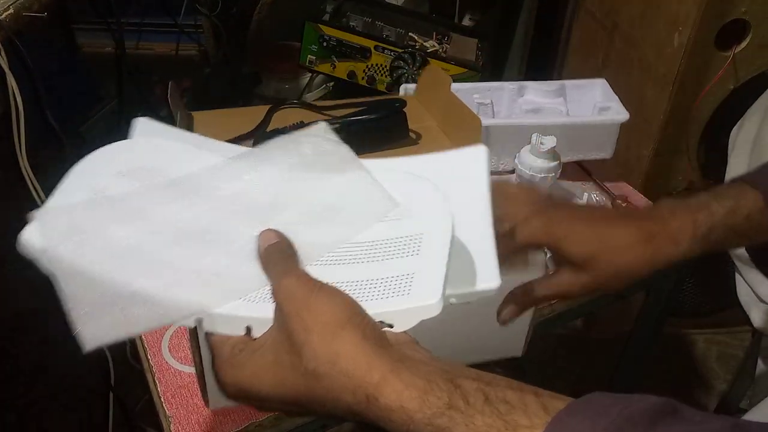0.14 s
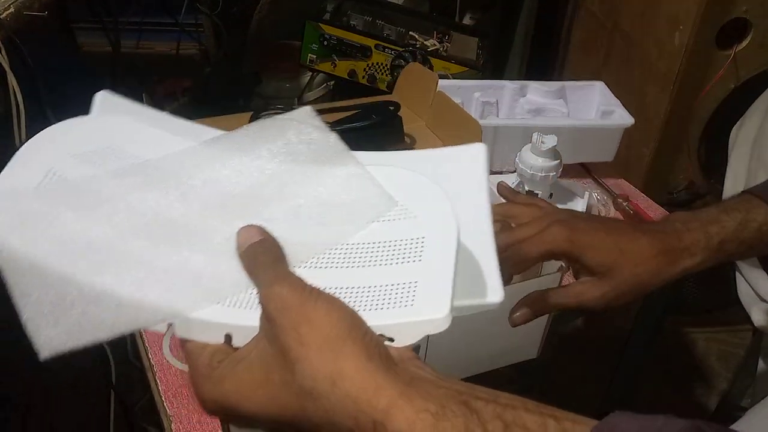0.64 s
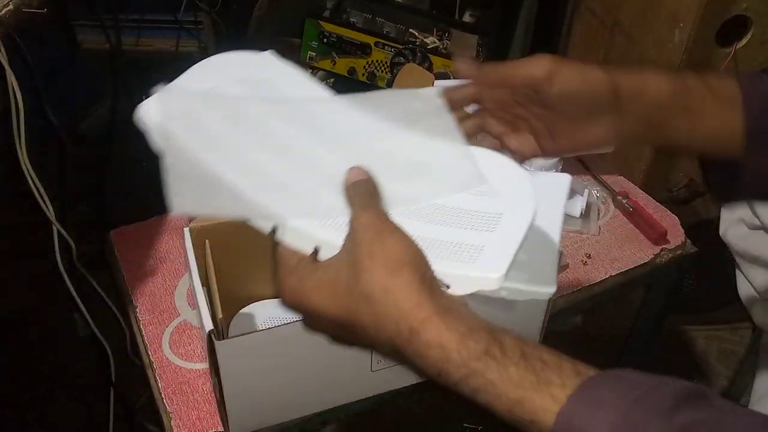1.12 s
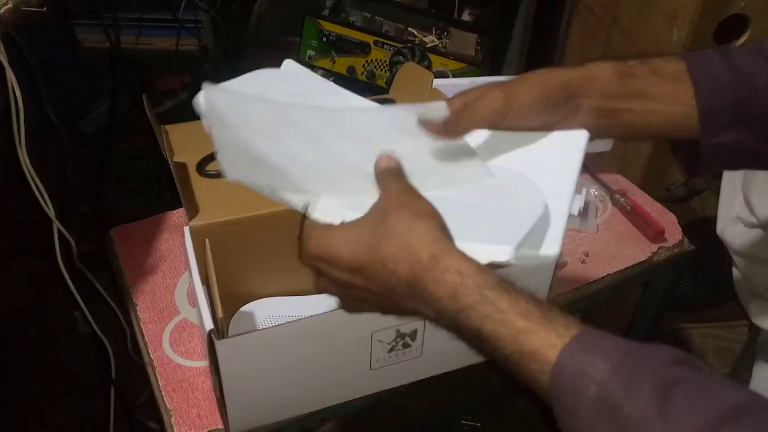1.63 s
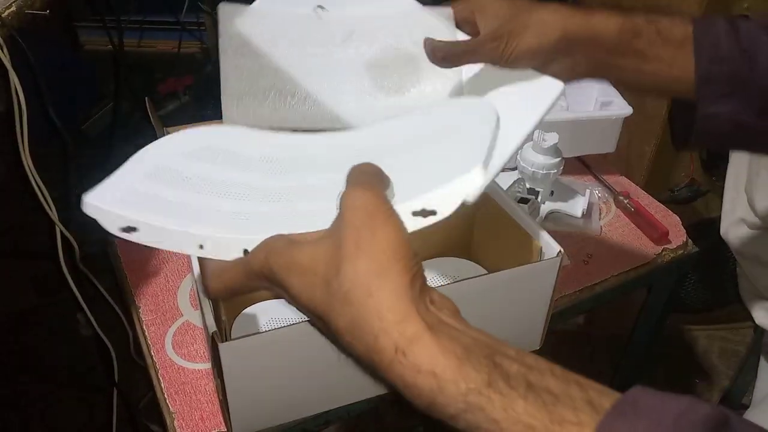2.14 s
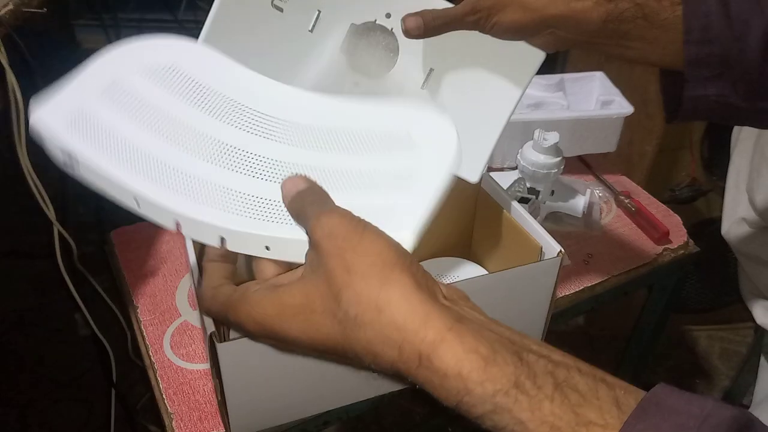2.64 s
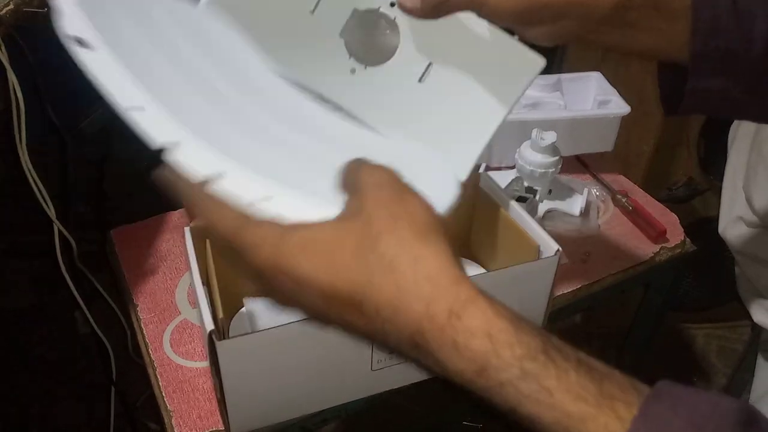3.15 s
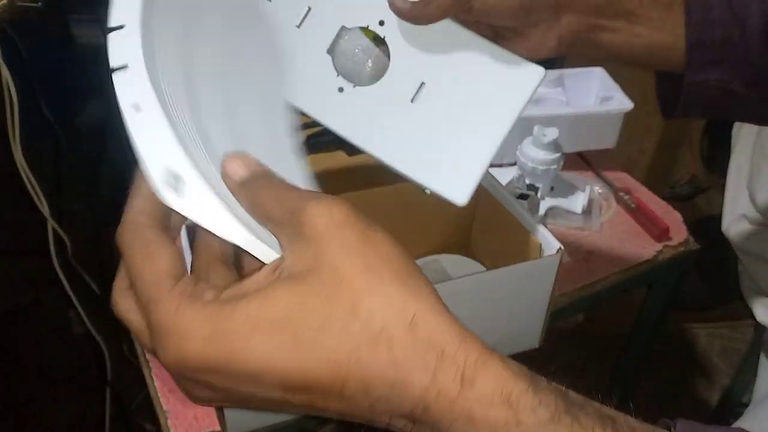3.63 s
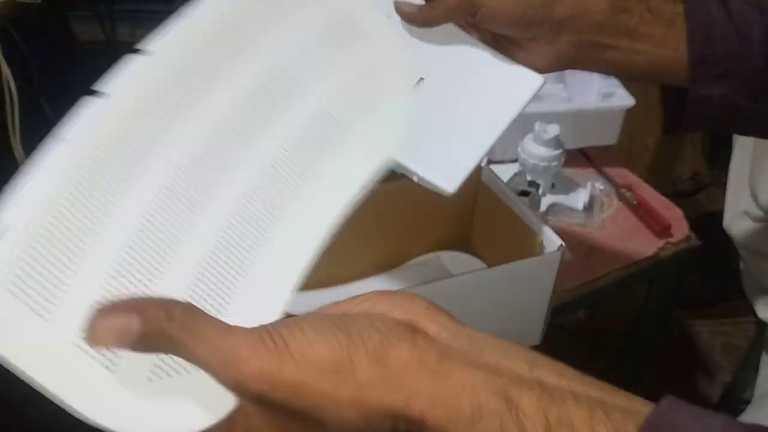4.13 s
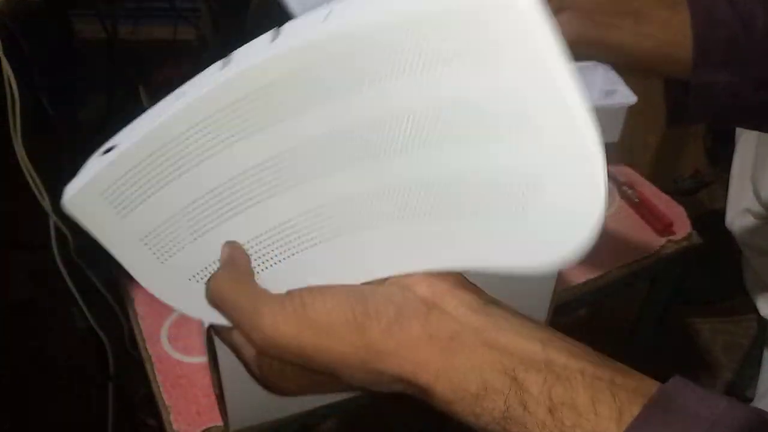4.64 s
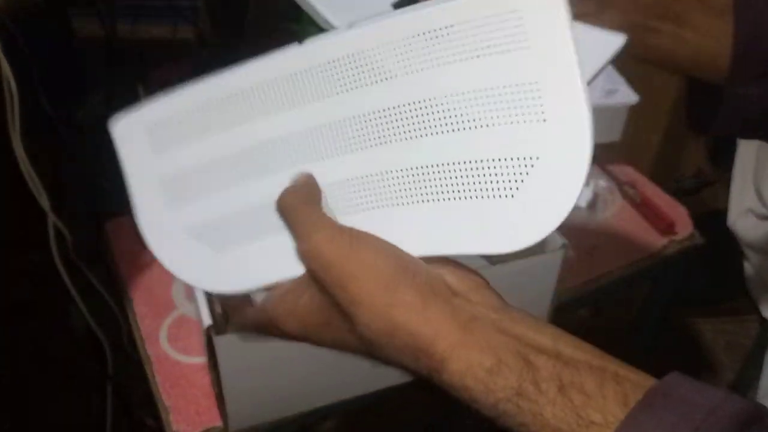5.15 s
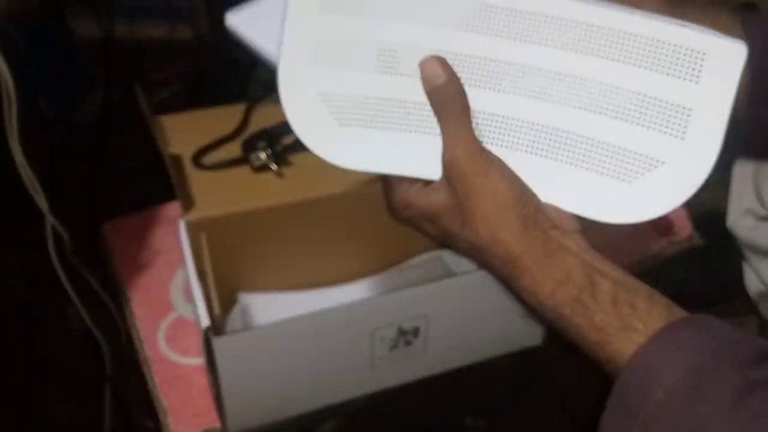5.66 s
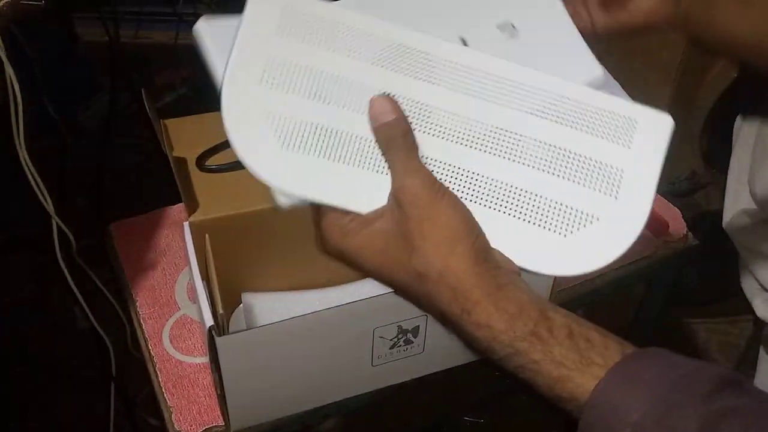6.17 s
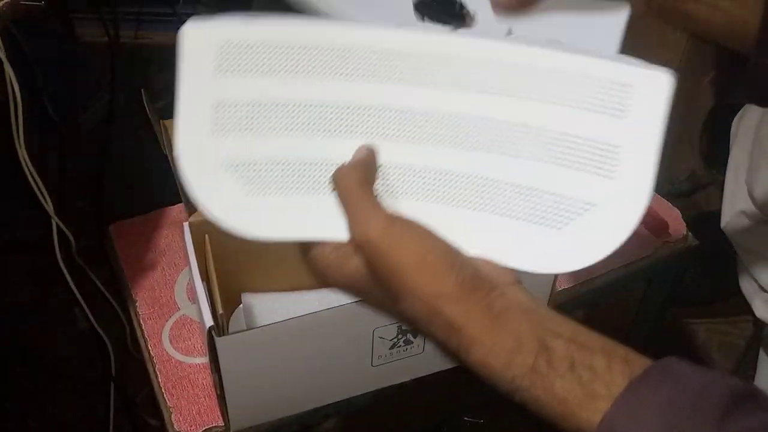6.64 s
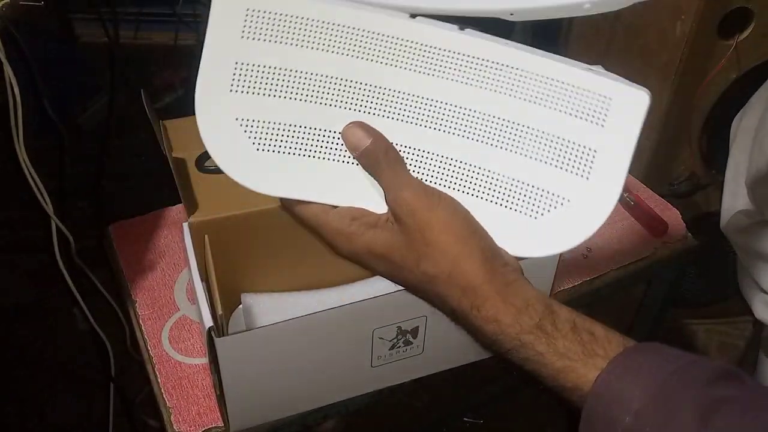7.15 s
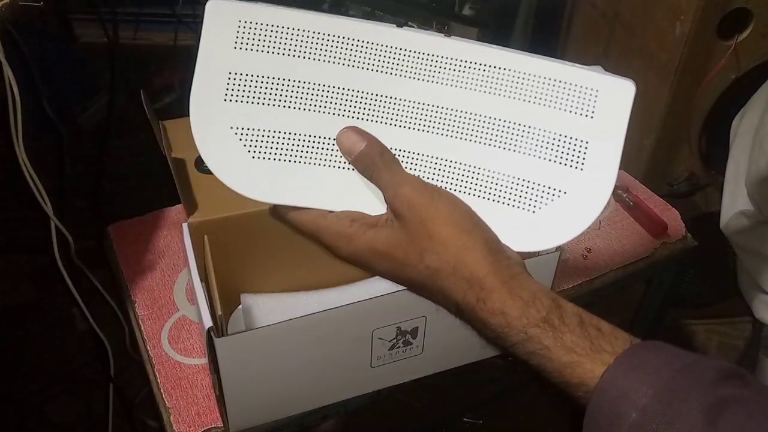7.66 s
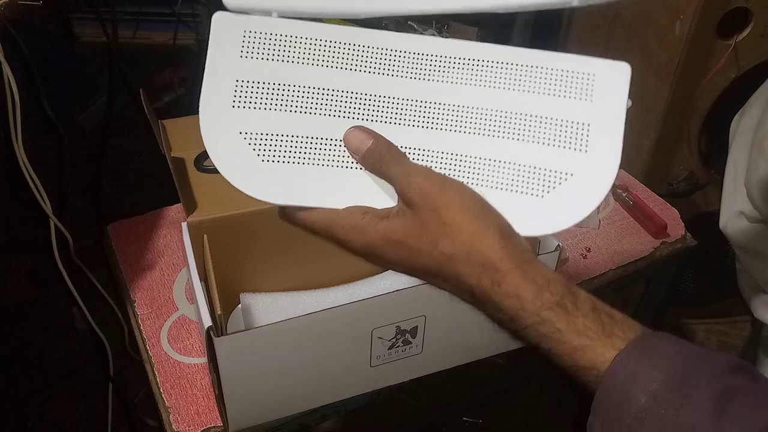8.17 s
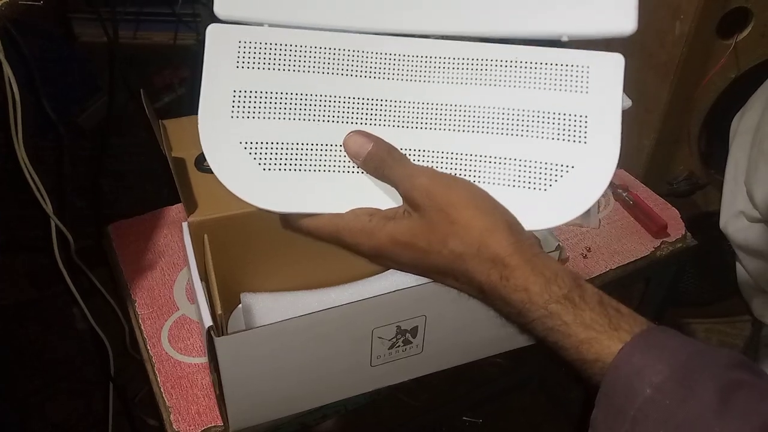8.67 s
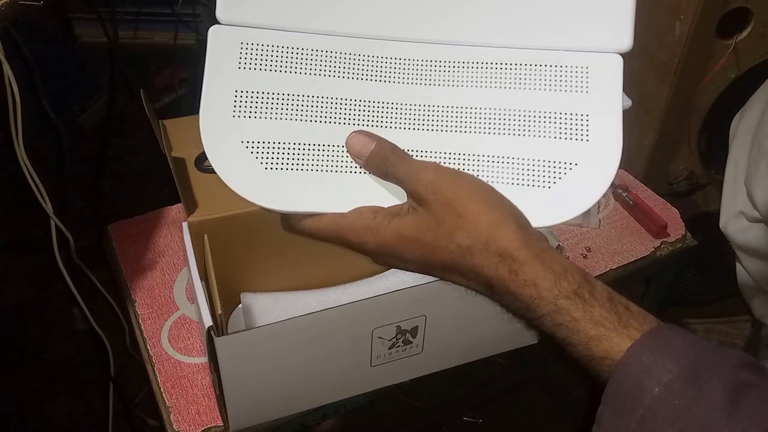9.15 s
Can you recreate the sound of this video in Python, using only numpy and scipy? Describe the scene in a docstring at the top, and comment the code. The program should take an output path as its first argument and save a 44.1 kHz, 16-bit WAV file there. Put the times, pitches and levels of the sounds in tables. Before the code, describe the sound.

Close phone pickup in a small room with low, soft rumble and barely audible hiss. From 0 to 0.6 s, dull knocks and gritty cardboard scraping come in quick succession as plastic panels leave a box, fading by 0.9 s; a crisp foam snap ticks at about 0.76 s. After a short lull, a loud, hard plastic clack hits at 1.4 s, followed until 2.1 s by weaker clacks, rattling and bright sliding with short resonant squeaks, as thin panels separate. Quiet rubbing follows, then another sharp clack near 3.15 s. From 3.3 to 6.3 s only faint finger slides, hollow palm rubs and tiny foam ticks remain, with a very faint falling whine around 6.1 s. Light plastic ticks cluster at 6.5-6.7 s; soft taps fall near 7.3, 7.9 and 8.3 s, a barely audible one at 9 s, then near quiet.

```python
"""Stiff panels and foam lifted from a cardboard box

Thin panels and foam sheets are turned over by hand, close to a phone, with a low rumble in the room.
The box is knocked and scraped, and late the panels bump softly: struck decaying modes and coloured grains.
Panels clack together and ring briefly as sums of damped modes; noise stirs the same modes as fingers slide,
and a loose grip lets some sing. Strokes and a palm are trains of tiny slips through resonances; foam snaps
are damped ticks with noise. A rustle, a faint falling whine, faint hiss and short echoes complete the scene."""
import sys
import numpy as np
from scipy import signal
from scipy.fft import rfft, irfft, next_fast_len
from scipy.io import wavfile
from scipy.ndimage import uniform_filter1d

SR = 44100
rng = np.random.default_rng(int(sys.argv[2]) if len(sys.argv) > 2 else 0)


def wav_out(sig):
    """Save sig, one row per channel (or a flat mono array), as 16-bit PCM at SR to the path in sys.argv[1]."""
    wavfile.write(sys.argv[1], SR, np.round(np.clip(np.atleast_2d(sig).T, -1, 1) * 32767).astype(np.int16))


def gain_from_decibels(decibels):
    """Convert decibel values to linear amplitude factors."""
    exponent = np.asarray(decibels, float) / 20
    return 10 ** exponent


N = 409688

# panel contacts: t/s, strength/dB, low-mode weight/dB, treble weight/dB, ringing left by the grip/s
CONTACTS = [(1.4131, -5.5, -17.5, -19, 0.16), (1.519, -25.5, -7, -40, 0.17), (1.6748, -32, -8, -38, 0.29),
            (1.7353, -23.5, -2.5, -30, .21), (1.8087, -14, -16, -27.5, 0.19), (1.8493, -14, -26, -26, 0.05),
            (1.8603, -14.5, -13, -23, 0.085), (1.9355, -20.5, -2.5, -17, 0.17),
            (2.01, -24.5, -35, -24, 0.18), (2.793, -53, -5, 7, 0.15), (3.156, -11, -12, -13.5, 0.14),
            (3.1574, -43, -24, -6, 0.17), (3.1893, -27, -14, -11, 0.17), (3.2894, -47, 10.5, -10, 0.39),
            (5.4332, -50, -1, -31, 0.16), (5.881, -52, -20.5, -36, .22), (6.3704, -47, -37, -29, .22),
            (6.5328, -41, -26, -38, 0.053), (6.6054, -44, -21, -39, 0.23), (6.6473, -35.5, -27, -23, 0.16),
            (6.8717, -55, -38, 2.5, 0.067), (7.295, -31.5, -21, -18, 0.084), (7.5745, -50, -12, -22, .09),
            (7.876, -22.5, -22, -57, 0.094), (8.3326, -22.5, -5.5, -25, 0.075), (8.985, -62, -4, -18, .16)]
# dull knocks on the box and, late, soft bumps of the panels:
# t/s, strength/dB, deep-mode weight/dB, click weight/dB
DULL_KNOCKS = [(0.004, -48.5, 23, -18), (0.123, -17, -23, 6.5), (0.145, -28.5, 5, 16),
               (0.198, -27.5, 1, 10), (0.28, -42.5, 12.5, -8), (0.333, -30, -23, -0.5),
               (0.372, -28, -25, -6.5), (0.415, -31.5, -8, -11), (0.432, -27.5, -9, 2.5),
               (0.519, -33.5, -21, -2.5), (0.556, -42.5, -17, -1.5), (0.823, -37.5, -16, -9),
               (0.853, -41.5, -23, -26), (2.949, -45.5, -16, -4), (3.28, -52, 2, 5), (3.514, -56, 4.5, -9),
               (5.053, -51.5, 8, 0), (8.329, -47.5, -16, 3.5), (8.984, -50.5, -7.5, -8.5)]
# foam snaps: t/s, strength/dB, tick f/Hz
FOAM_SNAPS = [(0.7595, -34, 6400), (1.0295, -62, 2770), (1.1084, -60.5, 4700), (2.361, -53, 6330),
              (4.4643, -47.5, 4170), (5.6373, -40.5, 4700), (5.7689, -49, 4150), (5.792, -50.5, 4220),
              (7.4794, -72, 2850)]
# panel modes: f/Hz, relative level/dB, own decay time t60/s
PANEL_MODES = [(730, -14, .13), (931, -10, .15), (1174, -8, .4), (1241, -8, .4), (1425, -10, .15),
               (1490, -10, .2), (1620, -13, .15), (1800, -12, .2), (1935, -9, .19), (2020, -7, .25),
               (2180, -7, .3), (2229, -4, .3), (2500, -9, .25), (2770, -4, .15), (2880, -2, .13),
               (3004, -2, .22), (3040, -4, .15), (3160, -5, .13), (3235, -5, .1), (3400, -9, .15),
               (3591, -5, .19), (3780, -8, .15), (3940, -3, .13), (4240, -5, .14), (4365, -5, .14),
               (4595, -8, .17), (4790, -4, .16), (5093, -10, .18), (5300, -9, .2), (5453, -10, .2),
               (5720, -12, .25), (6530, -15, .16)]
# spectrum of foam noise: f/Hz, relative level/dB
FOAM_SPECTRUM = [(4120, -38), (7000, -4), (8340, -21.5), (11500, -1.5), (13600, -8.5), (14500, -2),
                 (15100, 2), (15700, -8), (16200, -9)]
# spectrum of rubbed cardboard: f/Hz, relative level/dB
CARDBOARD_SPECTRUM = [(35, -46), (60, -19), (87, -11), (173, -12.5), (225, 3), (392, -2), (601, -0.5),
                      (879, -18), (960, -8.5), (2000, -23), (2600, -34.5), (4400, -120)]
STROKE_RISE_DB_PER_S, STROKE_FALL_DB_PER_S = 448, 261


def rms_one(x):
    """Normalization: scales to unit mean power."""
    return x / np.sqrt(np.mean(x ** 2) + 1e-20)


def in_time(rows):
    """Linear interpolation: gives each table column one value per sample."""
    s, *columns = np.transpose(rows)
    return [np.interp(np.arange(N) / SR, s, column) for column in columns]


def power_sum(*tracks_db):
    """Incoherent addition: levels add as powers."""
    return 10 * np.log10(sum(gain_from_decibels(2 * db) for db in tracks_db))


def coloured(x, spectrum, low_hz=20, high_hz=20000):
    """Linear filtering: weights a signal's spectrum between two soft edges; rms 1."""
    hz = np.arange(1, N // 2 + 2) * SR / N
    at, db = np.transpose(spectrum)
    edges = 1 / np.sqrt((1 + (low_hz / hz) ** 8) * (1 + (hz / high_hz) ** 8))
    gain = gain_from_decibels(np.interp(np.log(hz), np.log(at), db))
    return rms_one(irfft(rfft(x) * gain * edges, N))


def drift(rate_hz):
    """Low-pass random process: slow chance of unit spread, from two equal poles at the given rate."""
    step = 40   # samples between slow values
    r = np.exp(-2 * np.pi * step * rate_hz / SR)
    noise = rng.standard_normal(N // step + 2002)
    slow = signal.lfilter([1], [1, -2 * r, r * r], noise)[2000:]   # without the filter's start
    return np.interp(np.arange(N) / step, np.arange(len(slow)), rms_one(slow))


def grains(per_s, spread_db):
    """Stick-slip friction: tiny slips at random moments, a few much stronger than the rest; rms 1."""
    sizes = gain_from_decibels(spread_db * np.minimum(rng.exponential(1, N), 5)) * rng.choice([-1, 1], N)
    return rms_one(sizes * (rng.random(N) < per_s / SR))


def ring(force, hz, t60):
    """Damped oscillator: a unit click sets a decaying sine of height 1 ringing."""
    r, w = gain_from_decibels(-60 / (t60 * SR)), 2 * np.pi * hz / SR
    return signal.lfilter([0, np.sin(w)], [1, -2 * r * np.cos(w), r * r], force + 1e-18)


def resonance(x, hz, width_hz):
    """Resonant transmission: a band-pass with gain 1 on top."""
    r = np.exp(-np.pi * width_hz / SR)
    feedback = [1, -2 * r * np.cos(2 * np.pi * hz / SR), r * r]
    return signal.lfilter([(1 - r * r) / 2, 0, (r * r - 1) / 2], feedback, x)


def patchy(x, low_hz, high_hz, patchy_db, count):
    """Modal modulation of a flexing sheet: close resonances swell and fade each on its own; rms 1."""
    step = (high_hz / low_hz) ** (1 / count) - 1
    out = np.zeros(N)
    for k, hz in enumerate(np.geomspace(low_hz, high_hz, count)):
        out += (-1) ** k * gain_from_decibels(patchy_db * drift(6.0)) * resonance(x, hz, 0.85 * step * hz)
    return rms_one(out)


def fade(s, t60, rise_s):
    """Exponential decay: start index and envelope of a burst that rises fast and dies away."""
    start = round(s * SR)
    t = np.arange(min(N - start, int(1.5 * t60 * SR) + 2)) / SR
    return start, (1 - np.exp(-t / rise_s)) * gain_from_decibels(-60 * t / t60)


def swells(start, hold, levels_db, rise_db_per_s, fall_db_per_s):
    """Exponential growth and decay: events rise, hold and fall, adding as powers; one dB track a level."""
    t = np.arange(0, N / SR + .002, .001)[:, None]
    rise_db = rise_db_per_s * np.maximum(start - t, 0)
    fall_db = fall_db_per_s * np.maximum(t - start - hold, 0)
    power = gain_from_decibels(-2 * (rise_db + fall_db)) @ gain_from_decibels(2 * np.transpose(levels_db))
    total_db = 10 * np.log10(power + 1e-11)
    return [np.interp(np.arange(N) / SR, t[:, 0], track) for track in total_db.T]


def set_off(start, hold, levels_db, rise_db_per_s, fall_db_per_s):
    """Impulsive excitation: swells begin suddenly where a contact, snap or knock falls near the start."""
    near_s, sudden_db_per_s = .012, 6000
    blows = np.array([row[0] for row in CONTACTS + FOAM_SNAPS + DULL_KNOCKS])
    nearest = blows[np.abs(start[:, None] - blows).argmin(axis=1)]
    struck = np.abs(start - nearest) < near_s
    return swells(np.where(struck, nearest + .002, start), hold, levels_db,
                  np.where(struck, sudden_db_per_s, rise_db_per_s), fall_db_per_s)


def scrape():
    """Stick-slip friction: grains coloured by cardboard die out as the stack comes free; knocks jolt them."""
    # scraping in the box: t/s, level/dB
    scrape_level = [(0.0, -23.5), (.07, -37), (.3, -45.5), (.6, -53.5), (.66, -53), (.86, -57.5),
                    (1.0, -62.5), (1.3, -91)]
    jolt_db, jolt_s, jolt_fall_db_per_s = -9, 0.016, 352.5
    s, knock_db = np.transpose(DULL_KNOCKS)[:2]
    jolts_db, = swells(s, jolt_s, [knock_db + jolt_db], 3000, jolt_fall_db_per_s)
    level_db = power_sum(*in_time(scrape_level), jolts_db)
    return gain_from_decibels(level_db - 4.5) * coloured(grains(2500, 5.8), CARDBOARD_SPECTRUM)


def knocks():
    """Modal excitation: dull knocks on the box and, late, soft panel bumps ring modes, each with a click."""
    # modes of the knocks and bumps: f/Hz, relative level/dB, decay time t60/s
    knock_modes = [(101, -15.5, 0.21), (224.1, -3, .3), (370, -1, 0.034), (488, -21, 0.87),
                   (588.3, 6.5, 0.018), (682.5, 6, 0.021), (820, -5.5, 0.03), (949, -8.5, .07)]
    s, strength_db, deep_db, click_db = np.transpose(DULL_KNOCKS)
    at = np.round(s * SR).astype(int)
    chance_db = 0.75 * rng.standard_normal((len(s), len(knock_modes)))
    out = np.zeros(N)
    for k, (hz, level_db, t60) in enumerate(knock_modes):
        struck_db = strength_db - 6.5 + level_db + deep_db * (hz < 400) + chance_db[:, k]
        force = np.zeros(N)
        force[at] = (-1) ** k * gain_from_decibels(struck_db)
        out += ring(force, hz, t60)
    force = np.zeros(N)
    force[at] = gain_from_decibels(strength_db + click_db)
    click = ring(force, 1900, 0.003) - gain_from_decibels(-3.0) * ring(force, 3500, 0.0022)
    return out + signal.sosfilt(signal.butter(2, 5000, fs=SR, output="sos"), click)


def stroke_levels():
    """Superposition of strokes: level tracks of the bright, dull and hissing parts."""
    # hands and foam over the panels: start t/s, hold/s, level/dB, dull part level/dB, foam hiss level/dB
    # (the last two against the stroke)
    strokes = [(0.0, 0.045, -43, 2, -13), (0.079, 0.12, -48, 3.5, -12), (.123, 0.017, -41.5, 3.5, -17),
               (0.182, 0.116, -45.5, 1, -12.5), (.3, .04, -56, 5, -10), (.372, .05, -55.5, 4, -11),
               (0.421, 0.0068, -53, 8.5, -20), (0.473, .05, -61, 7, -13), (0.582, 0.081, -85, 13, -25),
               (0.698, 0.1, -69.5, 1, -16), (0.829, 0.039, -89.5, 22, -20), (1.017, 0.15, -81.5, 9, -25),
               (1.238, .08, -57, 0.5, -7), (1.355, 0.024, -49, 6, -13.5), (1.44, .02, -34.5, -6, -37.5),
               (1.585, 0.026, -58.5, -5, -5), (1.69, .02, -50.5, -4, -13.5), (1.725, .02, -38, -6, -20),
               (1.837, 0.038, -29.5, -16, -23), (1.932, 0.027, -32, -30, -19.5),
               (2.01, 0.045, -53, -6, -4.5), (2.15, 0.11, -81, -0.5, -1), (2.284, 0.2, -67.5, -10, -5.5),
               (2.523, .16, -67, -9.5, -2), (2.74, 0.036, -76, 0, -2), (2.81, .025, -66, -4, 2),
               (2.936, .2, -64.5, -6, -2.5), (3.183, .02, -43.5, 0.5, -9), (3.219, 0.11, -59, 4, -9),
               (3.368, 0.111, -70, 4.5, -9), (3.529, 0.018, -62.5, 4, 0.5), (3.652, 0.39, -81, 6, -8.5),
               (3.784, 0.046, -67.5, -8.5, -4.5), (3.867, .1, -75.5, 3.5, -9),
               (3.987, .07, -70.5, -3.5, -5.5), (4.08, .1, -80.5, 3.5, -10), (4.226, .02, -62, -15, -12.5),
               (4.264, 0.021, -51.5, -5, -12.5), (4.454, 0.0037, -64.5, -10.5, -7),
               (4.521, 0.022, -72, -6, -4.5), (4.654, 0.076, -66.5, -13.5, -8),
               (4.799, .22, -72, -10.5, -8), (5.02, .02, -66.5, -7, -11), (5.064, 0.023, -58, -17.5, -14),
               (5.209, 0.05, -58, -12, -9.5), (5.3, 0.067, -66.5, -14, -7.5), (5.42, 0.023, -63.5, -7, -12),
               (5.538, 0.095, -72, -3.5, -13), (5.647, 0.035, -66.5, -5, -9),
               (5.758, 0.043, -70.5, 0.5, -24), (5.88, 0.022, -63, -3, -14), (5.995, 0.087, -61, -9, -11.5),
               (6.108, 0.099, -60.5, -10.5, -15.5), (6.272, 0.055, -75, -3, -20),
               (6.35, 0.073, -63.5, -32, -13), (6.476, 0.055, -69, -14, -9), (6.525, 0.0045, -63, -10, -37),
               (6.622, 0.058, -62, -10, -8), (6.862, 0.011, -64.5, -31.5, -6),
               (6.92, 0.0727, -74, -11, -10), (7.294, 0.037, -64.5, 9, -19.5), (7.44, 0.025, -79, 7, -29.5),
               (7.573, .005, -74, -2, -14), (7.876, 0.072, -70.5, 6.5, -30), (8.334, .06, -67.5, 2.5, -25),
               (8.469, 0.0076, -95, 13, -5), (8.977, 0.0018, -84.5, 20, 5)]
    s, hold, stroke_db, dull_db, foam_db = np.transpose(strokes)
    return set_off(s, hold, [stroke_db, stroke_db + dull_db, stroke_db + foam_db],
                   STROKE_RISE_DB_PER_S, STROKE_FALL_DB_PER_S)


def slide(bright_db, dull_db, hiss_db):
    """Friction through a resonant sheet: dense fine slips flutter together as the pressure wavers."""
    # sliding spectrum: f/Hz, relative level/dB
    slide_colour = [(350, -24), (600, -2), (806, -20.5), (1210, -6.5), (1630, -9), (2210, -9), (2620, -12),
                    (3000, -4), (3400, -0.5), (4030, 0.5), (6410, -8.5), (7860, -33.5), (9000, -30.5),
                    (11700, -66.5), (19800, -120)]
    dull_below_hz = 3050
    flutter = gain_from_decibels(2.0 * drift(20))
    bright = coloured(grains(9000, 4.0), slide_colour, low_hz=dull_below_hz)
    dull = coloured(grains(6000, 1.5), slide_colour, high_hz=dull_below_hz)
    bright = patchy(bright, low_hz=2300, high_hz=8500, patchy_db=4.0, count=40)
    dull = patchy(dull, low_hz=780, high_hz=2600, patchy_db=3.5, count=18)
    hiss = coloured(grains(9000, 3.5), FOAM_SPECTRUM)
    return flutter * (gain_from_decibels(bright_db - 2.5) * bright + gain_from_decibels(dull_db - 2.5) * dull + gain_from_decibels(hiss_db) * hiss)


def friction(stroke_db, songs_db):
    """Random modal excitation: fingers stir all panel modes; the shifting grip frees now one, now another."""
    parted_s, stacked_db = 1.1, -12   # until the stack is parted the panels damp each other
    stroke_ring_db, song_ring_db = -3, 1.5   # how much strokes and singing pairs stir the modes
    stacked = np.arange(N) < parted_s * SR
    from_strokes_db = stroke_db + stroke_ring_db + stacked_db * stacked
    ringing_db = power_sum(from_strokes_db, np.mean(songs_db, axis=0) + song_ring_db)
    out = np.zeros(N)
    for hz, level_db, t60 in PANEL_MODES:
        force_db = ringing_db - 42.5 + level_db + 4.0 * drift(6.7)
        out += ring(gain_from_decibels(force_db) * rng.standard_normal(N), hz, t60)
    return out


def rumble():
    """Filtered random noise: low bands fill the room at a slowly changing level."""
    # rumble spectrum: f/Hz, relative level/dB
    rumble_spectrum = [(18, -41.5), (30, -10), (40, -14), (48, 0), (59, 0), (75, -8), (102, 1.5),
                       (125, -3.5), (155, -2), (172, -12), (192, -2.5), (205, 0), (221, -1.5), (242, -9),
                       (312, -8), (420, -21), (550, -46.5), (920, -120)]
    # room rumble: t/s, level/dB
    rumble_level = [(0.0, -40.5), (0.1, -45), (0.2, -50), (0.44, -54), (0.8, -55.5), (1.22, -55.5),
                    (1.37, -55), (3.21, -55.5), (4.14, -58), (4.92, -59), (6.03, -58.5), (6.54, -57),
                    (7.37, -58.5), (7.94, -57.5), (9.29, -60)]
    level_db, = in_time(rumble_level)
    return gain_from_decibels(level_db) * coloured(rng.standard_normal(N), rumble_spectrum, high_hz=407)


def air():
    """Filtered random noise: a faint steady room hiss."""
    # hiss spectrum: f/Hz, relative level/dB
    air_spectrum = [(460, -46.5), (780, -19.5), (874, -4), (1030, -17.5), (1130, -6), (1200, -9.5),
                    (1250, -15), (1470, -17.5), (1690, -15.5), (2100, -18.5), (13700, -38), (15000, -22),
                    (16200, -27.5)]
    return gain_from_decibels(-82) * coloured(rng.standard_normal(N), air_spectrum, low_hz=800)


def snaps():
    """Impulsive release: foam cells burst, one heavily damped tick each, with a wide spit of noise."""
    out, spit = np.zeros(N), coloured(rng.standard_normal(N), FOAM_SPECTRUM)
    for s, strength_db, hz in FOAM_SNAPS:
        start, shape = fade(s, 0.0074, .0001)
        end = start + len(shape)
        tick = np.sin(2 * np.pi * hz * np.arange(len(shape)) / SR)
        out[start:end] += gain_from_decibels(strength_db - 1.5) * shape * (tick + gain_from_decibels(-5.5) * spit[start:end])
    return out


def rustle():
    """Noise through fluctuating resonances: a low rustle of sleeves and cardboard."""
    # rustle: t/s, level/dB
    rustle_level = [(.9, -89), (1.0, -75.5), (1.35, -60.5), (1.7, -66), (1.92, -59), (2.27, -72),
                    (3.3, -69.5), (3.6, -73), (5.85, -76.5), (6.24, -70), (6.73, -78), (7.42, -72.5),
                    (7.7, -77.5), (8.34, -75), (8.66, -82.5), (9.29, -83)]
    level_db, = in_time(rustle_level)
    rub = coloured(rng.standard_normal(N), CARDBOARD_SPECTRUM, low_hz=405, high_hz=680)
    return gain_from_decibels(level_db) * patchy(rub, low_hz=329.7, high_hz=760, patchy_db=4.0, count=9)


def song_levels():
    """Superposition of swells: one level track for each of three mode pairs."""
    # moments when a loose grip lets the pairs sing: start t/s, hold/s,
    # level/dB near 1.2 kHz, level/dB near 2.2 kHz, level/dB near 3 kHz
    songs = [(1.22, .04, -75, -58, -62.5), (1.328, 0.035, -44.5, -45.5, -57.5),
             (1.436, 0.034, -47, -46, -34), (1.505, 0.028, -57, -40.5, -58.5),
             (1.723, 0.013, -36, -38.5, -36.5), (1.837, 0.027, -36, -32, -31.5),
             (1.961, 0.023, -31.5, -42, -53.5), (2.034, 0.0079, -60, -50, -41.5),
             (2.102, 0.064, -68.5, -67.5, -82), (2.25, 0.47, -76.5, -90, -82.5),
             (2.789, .01, -62, -77, -85), (3.01, .03, -70, -92, -80.5), (3.183, 0.037, -43, -49, -42.5),
             (3.29, .04, -53, -65, -59), (3.4, 0.22, -69.5, -74, -78), (3.699, 0.54, -76, -81.5, -87.5),
             (4.27, 0.014, -73, -67, -48.5), (4.76, 0.019, -81, -65.5, -66.5),
             (4.98, 0.089, -66.5, -74, -73), (5.184, 0.28, -75, -86, -71), (5.539, 0.082, -70, -71, -71.5),
             (5.89, 0.021, -83, -71, -58.5), (6.064, 0.14, -85, -60, -59.5), (6.34, 0.091, -99, -58, -59),
             (6.634, 0.028, -86, -52, -54), (6.886, 0.017, -93, -95, -68), (7.296, .05, -65.5, -64.5, -74),
             (7.584, .01, -71.5, -92, -75.5), (7.883, 0.009, -77, -56, -47.5),
             (7.9, 0.056, -74, -76, -74.5), (8.322, .025, -60, -56.5, -51), (8.37, 0.064, -89, -81, -78),
             (8.983, 0.0063, -83, -76, -79)]
    s, hold, *pairs_db = np.transpose(songs)
    return set_off(s, hold, pairs_db, rise_db_per_s=498, fall_db_per_s=231.5)


def singing(songs_db):
    """Narrow-band resonance: each mode pair is rubbed into a narrow, beating tone."""
    # singing pairs, one a row: lower f/Hz, upper f/Hz
    singing_pairs = [(1174, 1241), (2181, 2229), (2876, 3020)]
    out = np.zeros(N)
    for level_db, pair in zip(songs_db, singing_pairs):
        for hz in pair:
            tone = rms_one(resonance(rng.standard_normal(N), hz, width_hz=16.0))
            out += gain_from_decibels(level_db - 9.5) * tone
    return out


def clacks():
    """Modal impact: contacts strike each mode with its own strength, damped by the grip, and rattle edges."""
    # rattling spectrum: f/Hz, relative level/dB
    rattle_spectrum = [(240, -56), (400, -20.5), (453, -20.5), (553, -24), (935, -12.5), (1090, -33),
                       (1180, -8.5), (1380, -15.5), (1870, -12), (2360, -3), (2550, -7), (2750, -5),
                       (5870, -11), (7870, -26.5), (16000, -20)]
    rattle_db, spread_db = -22, 3   # loose edges; chance in how a contact meets each mode
    hz, level_db, t60 = np.transpose(PANEL_MODES)[:, :, None]
    slips = grains(6000, 2.0)
    bands_hz = [(20, 2000), (2000, 4400), (4400, 7500), (7500, 20000)]
    low, mid, high, top = (coloured(slips, rattle_spectrum, a, b) for a, b in bands_hz)
    out = np.zeros(N)
    for s, strength_db, low_db, top_db, grip in CONTACTS:
        grip = max(grip, .02)
        chance = rng.standard_normal((3, len(PANEL_MODES), 1))
        hardness_db = 0.66 * (top_db + 20.5)   # hard contacts reach the high modes

        start, shape = fade(s, grip, rise_s=.0003)
        end = start + len(shape)
        rough = mid + gain_from_decibels(hardness_db - 3.5) * high + gain_from_decibels(low_db + 4) * low + gain_from_decibels(top_db + 12.5) * top
        out[start:end] += gain_from_decibels(strength_db + rattle_db) * shape * rough[start:end]

        t = np.arange(min(N - start, SR // 2)) / SR
        struck_db = strength_db - 19.0 + level_db + spread_db * chance[0]
        struck_db = struck_db + (low_db + 7.5) * (hz < 2000) + hardness_db * (hz > 4400)
        bent_hz = hz * (1 + .005 * chance[2])   # the grip bends the panel a little
        fall_db = 60 * t * (1 / t60 + (0.16 / grip) ** 2 / 0.69)   # own loss plus loss into the hand
        modes = gain_from_decibels(struck_db - fall_db) * np.sign(chance[1]) * np.sin(2 * np.pi * bent_hz * t)
        out[start:start + len(t)] += np.sum(modes, axis=0)
    return out


def palm():
    """Friction into a cavity: a palm rubs the hollow back, soft slips through one doubled resonance."""
    # palm strokes: start t/s, hold/s, level/dB
    palm_strokes = [(3.6, 0.087, -73), (3.739, 0.25, -73), (3.975, 0.23, -74), (5.007, 0.04, -81),
                    (6.622, 0.037, -63), (7.3, .04, -66), (7.878, .005, -61)]
    hollow_hz, width_hz = 1570, 290   # width of each of the two passes
    s, hold, level_db = np.transpose(palm_strokes)
    level_db, = set_off(s, hold, [level_db], STROKE_RISE_DB_PER_S, STROKE_FALL_DB_PER_S)
    hollow = resonance(grains(5000, 2.0), hollow_hz, width_hz)
    hollow = resonance(hollow, hollow_hz, width_hz)
    return gain_from_decibels(level_db + 2.8 * drift(13)) * rms_one(hollow)


def whine():
    """Frequency and amplitude modulation: a thin, breathy tone slides down."""
    # falling whine: t/s, f/Hz, level/dB
    whine_path = [(5.98, 780, -96), (6.02, 759, -75), (6.08, 646, -65), (6.16, 590, -67), (6.24, 576, -101)]
    hz, level_db = in_time(whine_path)
    tone = np.sin(2 * np.pi * np.cumsum(hz) / SR)
    return gain_from_decibels(level_db) * drift(40) * tone * (level_db > -90)


def room(x):
    """Multiple reflection: eight feedback delays, duller on every round."""
    t60_s, wall_cut_hz = 0.13, 2400
    size = next_fast_len(N + SR)
    turn = np.exp(-2j * np.pi * np.arange(size // 2 + 1) / size)   # delay by one sample
    dull = np.exp(-2 * np.pi * wall_cut_hz / SR)
    wall, echo = (1 - dull) / (1 - dull * turn), 0
    for k, lag in enumerate([613, 769, 907, 1051, 1193, 1327, 1499, 1657]):   # samples
        loop = gain_from_decibels(-60 * lag / SR / t60_s) * wall * turn ** lag
        echo = echo + (-1) ** k * loop / (1 - loop)
    return irfft(rfft(x, size) * echo, size)[:N]


def scene():
    """Superposition: handling close by, its room echoes, and the separate quiet layers."""
    bright_db, dull_db, hiss_db = stroke_levels()
    songs_db = song_levels()
    near = scrape() + knocks() + slide(bright_db, dull_db, hiss_db) + friction(bright_db, songs_db)
    near = near + singing(songs_db) + clacks() + palm()
    echoes = gain_from_decibels(-17) * room(near)
    return (near + echoes + rumble() + air() + snaps() + rustle() + whine())[None]


def suppress(x):
    """Downward expansion: turns the treble down wherever its level sinks under the threshold."""
    threshold_db, slope, most_db, above_hz = -78.5, 0.58, 7, 730   # slope in dB per dB
    treble = signal.sosfiltfilt(signal.butter(2, above_hz, "high", fs=SR, output="sos"), x)
    level_db = 10 * np.log10(uniform_filter1d(treble ** 2, size=900) + 1e-14)
    cut_db = np.clip(slope * (threshold_db - level_db), 0, most_db)
    return x + treble * (gain_from_decibels(-cut_db) - 1)


def roll_off(x):
    """The treble ends steeply here."""
    return signal.sosfilt(signal.butter(12, 16790, fs=SR, output="sos"), x)


def record(dry):
    """Band limiting: a phone microphone with a noise suppressor, steep low cut and top cut."""
    low_cut = signal.butter(8, 44, "high", fs=SR, output="sos")
    top_cut = signal.cheby2(12, 60, 17000, fs=SR, output="sos")
    mix = signal.sosfilt(low_cut, suppress(dry))
    mix = signal.sosfilt(top_cut, mix)
    return roll_off(mix)


dry = scene()
out = record(dry)
wav_out(out)
```